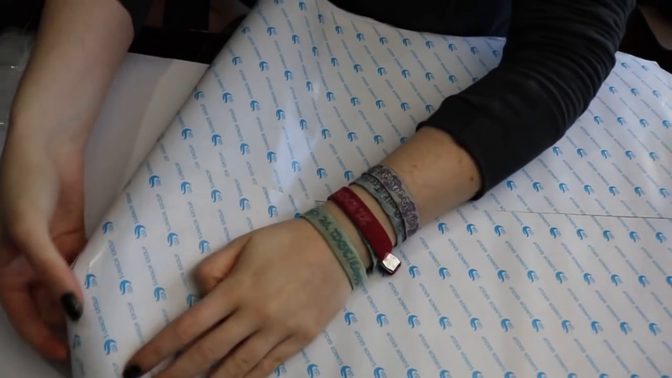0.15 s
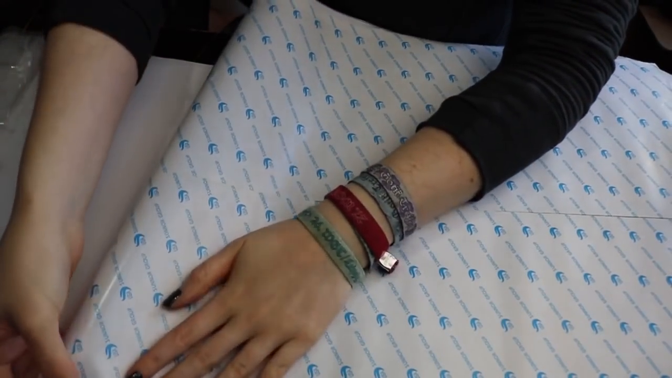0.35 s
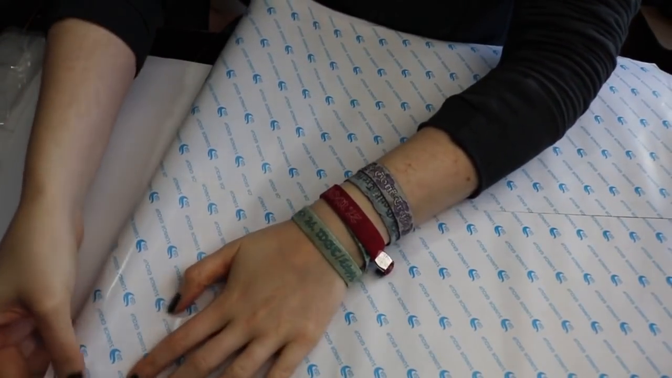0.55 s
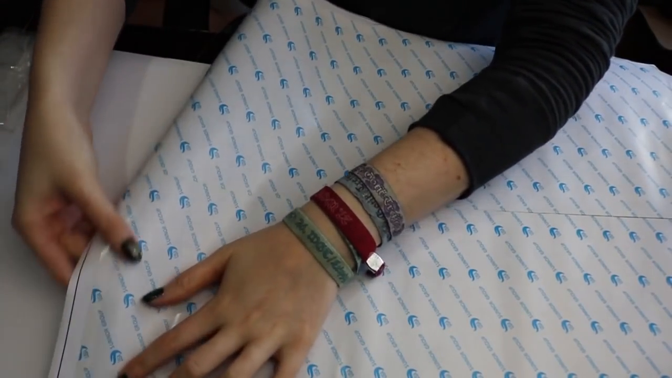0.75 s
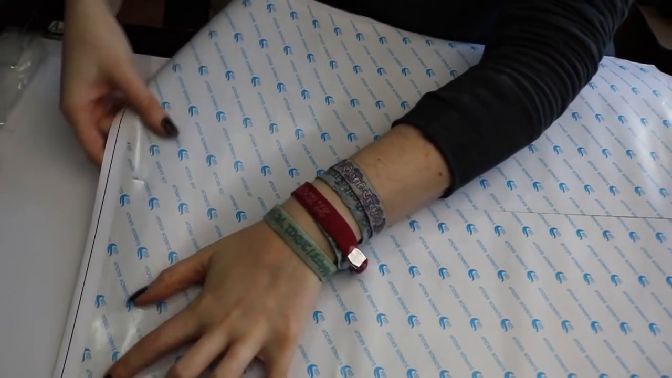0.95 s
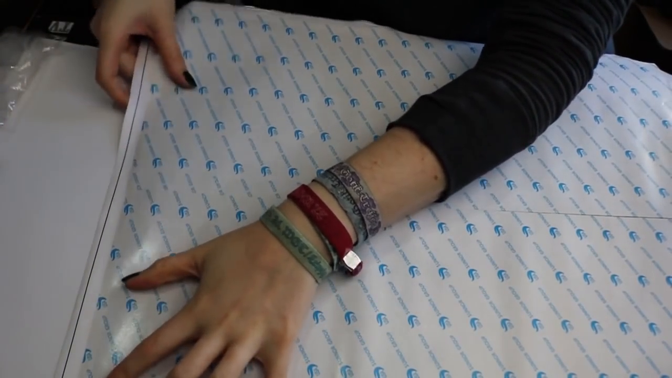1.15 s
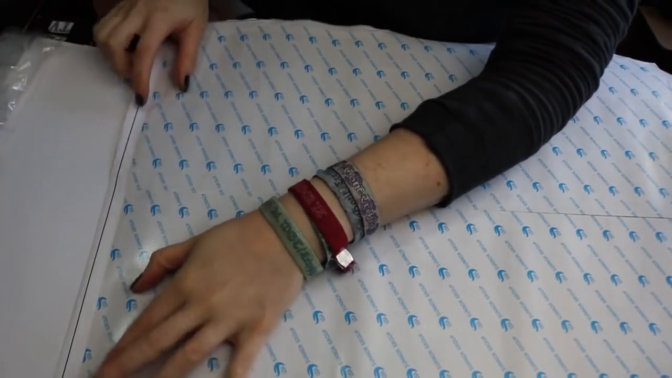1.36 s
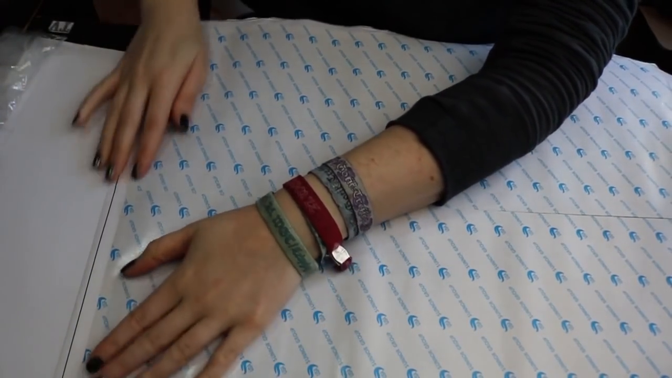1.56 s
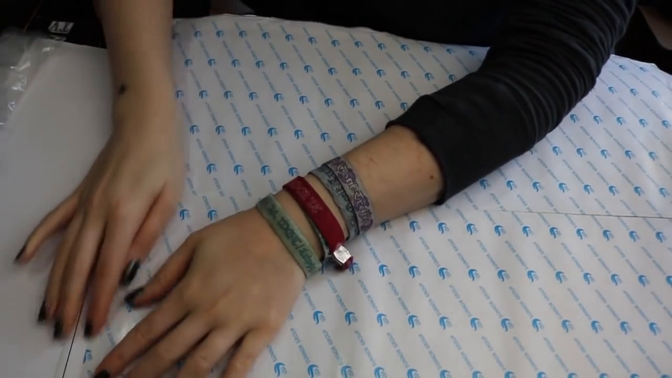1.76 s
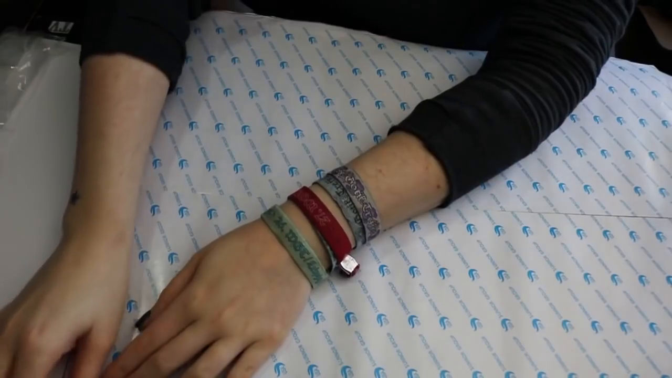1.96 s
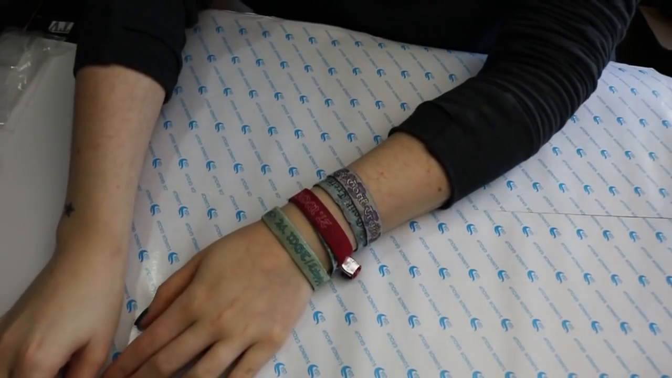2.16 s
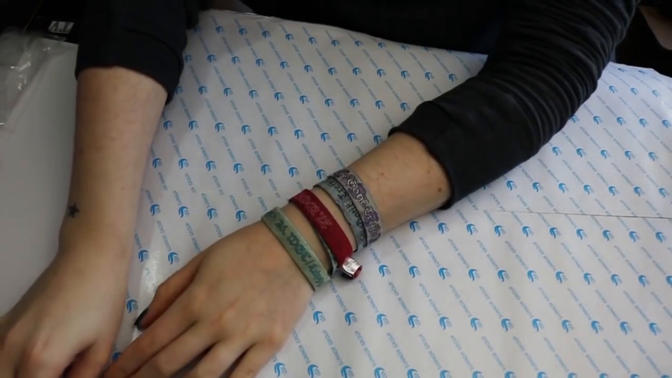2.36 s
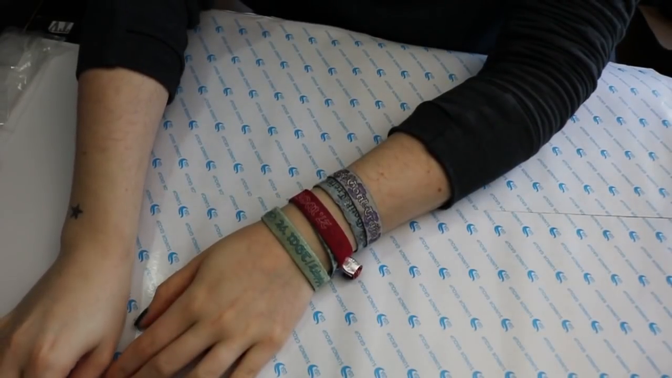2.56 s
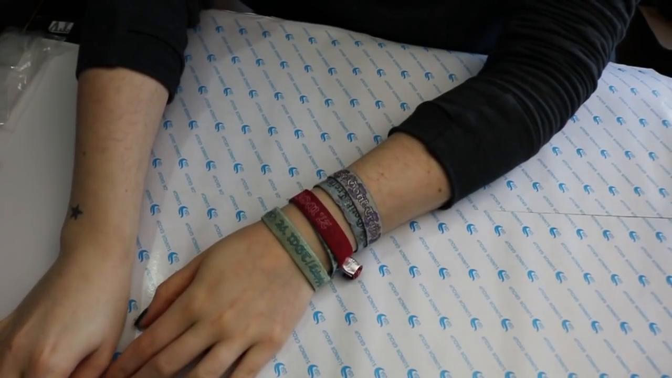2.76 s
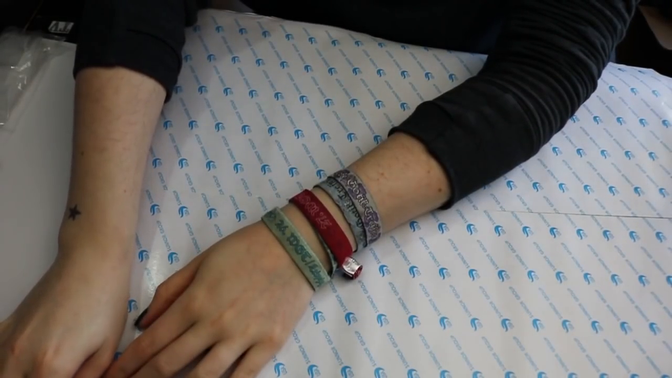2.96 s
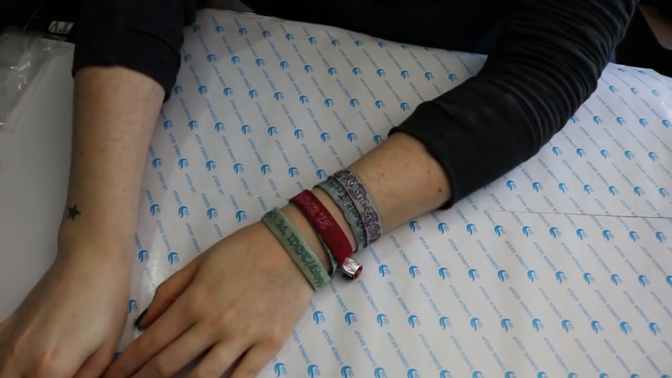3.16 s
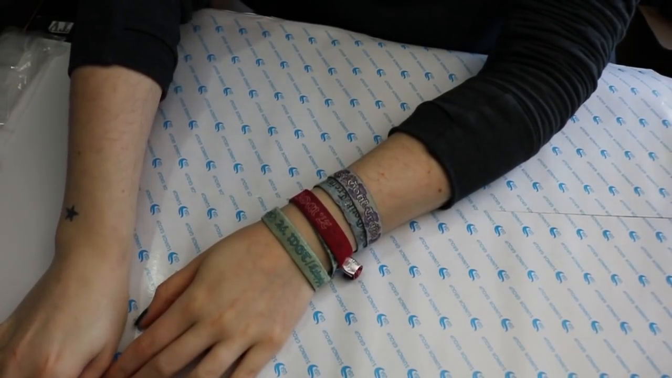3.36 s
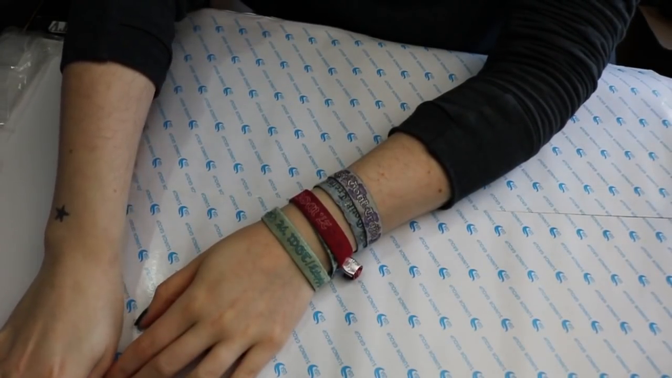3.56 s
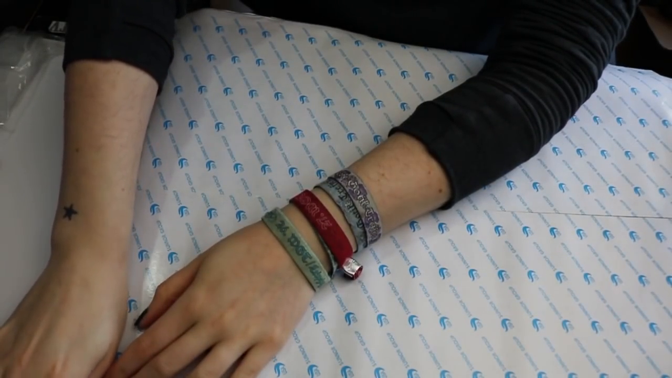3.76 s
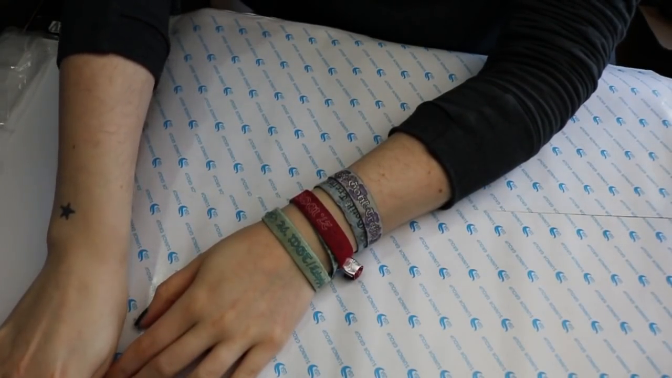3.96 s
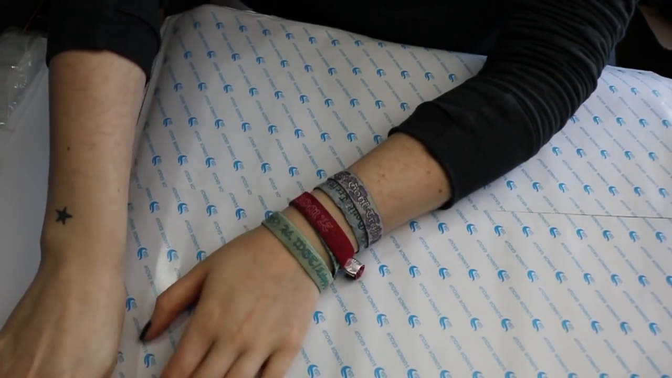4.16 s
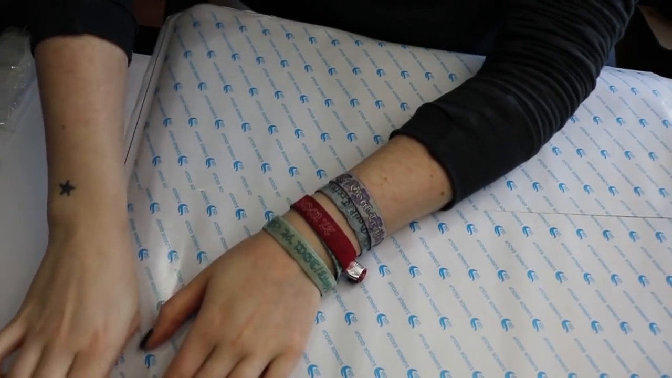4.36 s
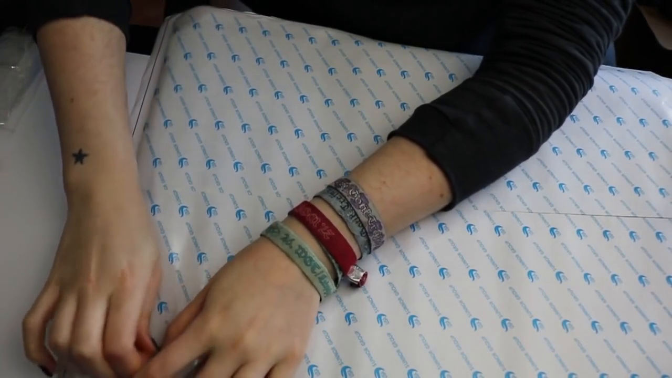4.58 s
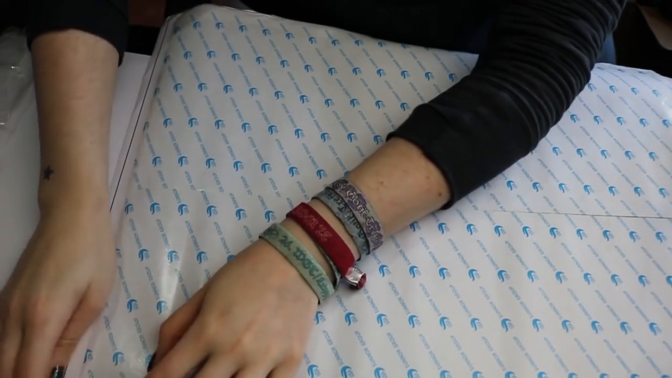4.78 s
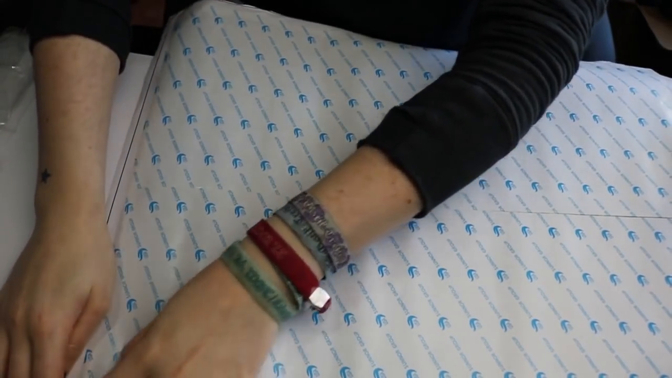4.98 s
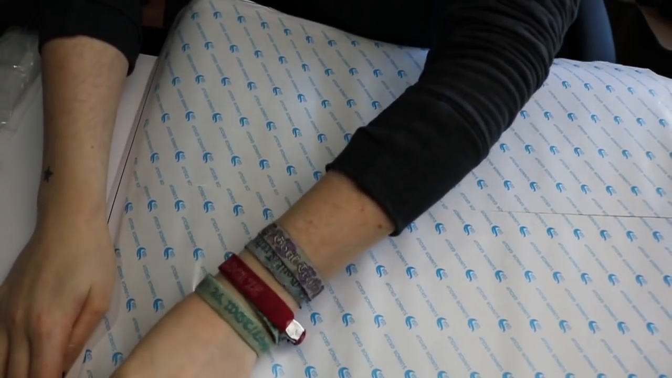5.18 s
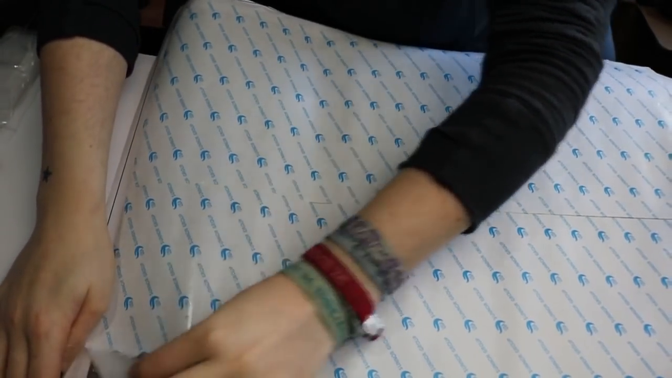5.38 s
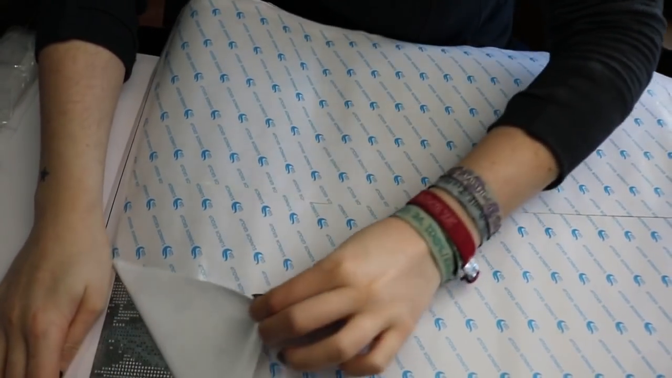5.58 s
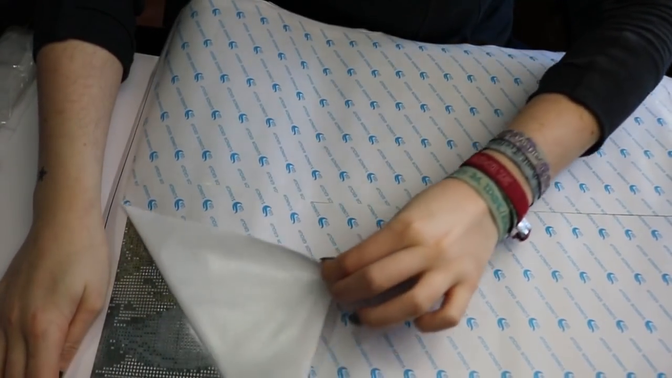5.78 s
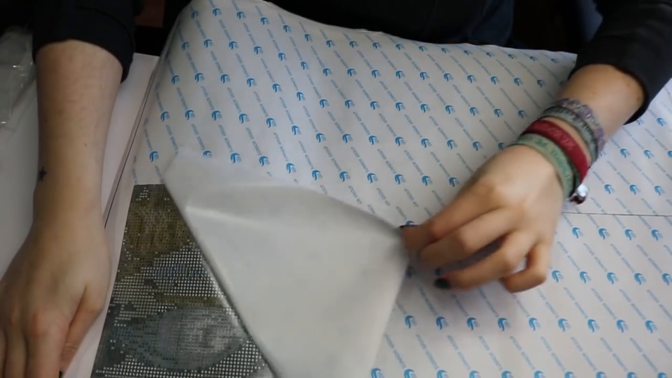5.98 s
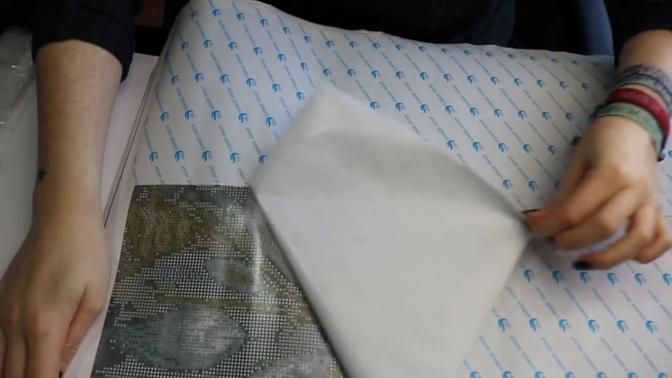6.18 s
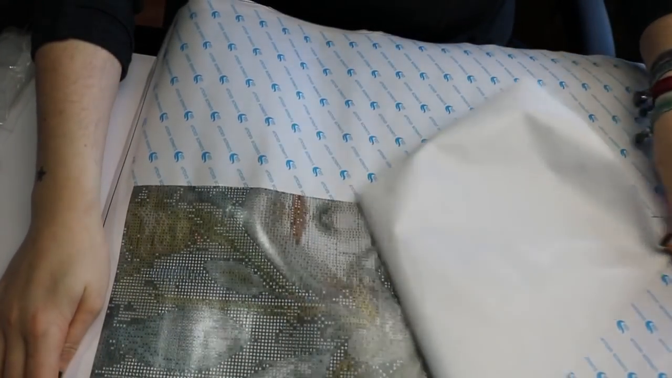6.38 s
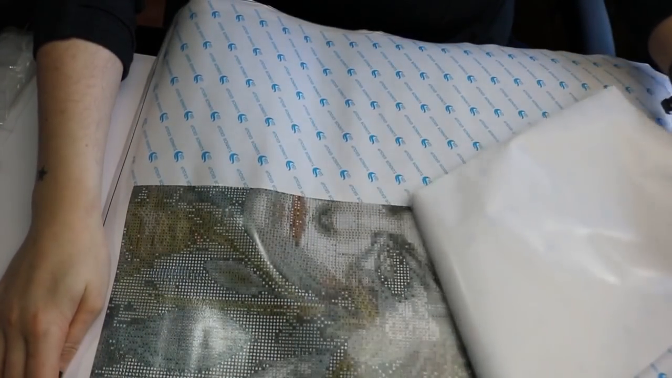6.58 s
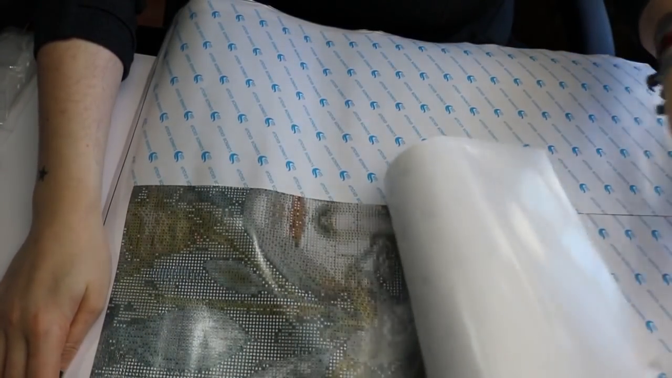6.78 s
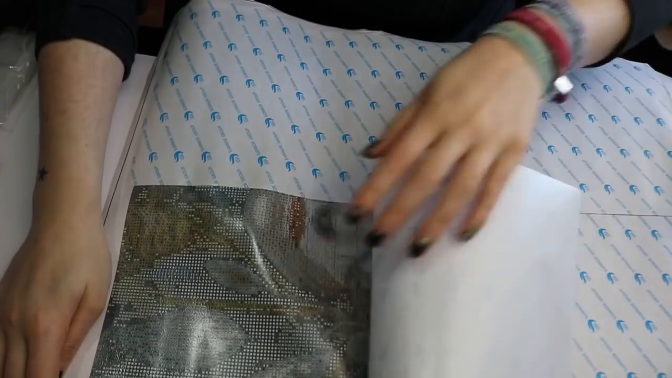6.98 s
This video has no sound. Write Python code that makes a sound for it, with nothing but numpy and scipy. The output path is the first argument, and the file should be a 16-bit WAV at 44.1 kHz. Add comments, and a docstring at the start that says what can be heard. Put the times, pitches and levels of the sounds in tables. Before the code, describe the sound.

A close, dry stereo sound in a small room with very faint rumble and hiss. At once plastic film is rubbed over a canvas, left of centre, with a low table thud and papery buckle near 0.1 s. Swishing strokes follow, strongest around 0.6-1.1 s, with a short rubbery squeak near 0.75 s. Between 1.2 and 1.5 s come little crease snaps and soft bumps, then a thin, airy smoothing rub that fades by about 2.1 s. From 2.2 to 3.9 s it is nearly quiet, with a few dull hollow knocks. A sharp, bright click cracks at about 4.5 s. Light rustles and ticks continue from 4.8 s; small scratchy tugs at 5.3-5.65 s loosen a corner. The peel starts softly, crackles, and swells to a brief rip at 6.4 s, crossing to the right. Papery flops and rustle at 6.7-6.95 s end it.

```python
"""Peeling plastic film off a canvas

Hands smooth the film on a canvas, press the canvas onto the table, pick up a corner and peel the film back.
Rubbing is shaped noise mixed with tiny slips, hollowed by a pocket of air; squeaks are short bursts of slips.
Creases snap, the canvas bumps and the sheet flops: each is a crack plus dying noise through a filter.
All is heard close by in stereo, over dull table thuds and the faint noise of a small quiet room."""
import sys
import numpy as np
from scipy import signal
from scipy.fft import rfft, irfft, next_fast_len
from scipy.io import wavfile
from scipy.ndimage import uniform_filter1d, map_coordinates

SR = 44100
rng = np.random.default_rng(int(sys.argv[2]) if len(sys.argv) > 2 else 0)


def output_pcm(signal):
    """Save a mono or channel-first signal as 16-bit PCM at the path in sys.argv[1].

    Samples are clipped to [-1, 1] before scaling.
    """
    pcm = np.clip(np.atleast_2d(signal).T, -1, 1) * 32767
    wavfile.write(sys.argv[1], SR, np.round(pcm).astype(np.int16))


N = 309846  # length in samples

# colour of the low body of the rubbing: pitch_hz, level_db
BODY_COLOUR = [(100, -29), (300, -23.5), (500, -3), (750, -4.5), (1150, -1), (1800, -10.5), (4000, -45)]
# colour of the film's rustle: pitch_hz, level_db
RUSTLE_COLOUR = [(500, -36.5), (1000, -19.5), (1500, -2.5), (2300, 0), (3500, -0.5), (5000, -10),
                 (7000, -15.5), (12000, -62)]
# colour of the high hiss: pitch_hz, level_db
HISS_COLOUR = [(2000, -22.5), (4500, 2.5), (6000, 1.5), (8000, -0.5), (10000, -2.5), (12500, -8),
               (15500, -13)]
# hollow note of the air under the sheet, higher as the pocket gets smaller: time_s, pitch_hz
POCKET_NOTE = [(0, 676), (.11, 443), (.17, 453), (.26, 660), (.31, 370), (.45, 233), (.66, 260), (.71, 450),
               (.755, 474), (.78, 757), (.84, 754), (1.2, 1056), (1.7, 1380), (1.95, 605), (4.85, 324),
               (5.55, 723), (6.25, 340), (7, 480)]
# modes of the air pocket: multiple of its note (a plain number), level_db
AIR_MODES = [(1, 5), (1.65, -27), (2.4, -13)]
# puffs of air squeezed out of the pocket: middle_s, length_s, level_db
PUFFS = [(0.153, 0.03, -34), (0.269, 0.025, -34), (0.753, 0.046, -34), (0.804, 0.028, -31)]
LAYER_DB = (-3.5, -1.5, 1.5)  # trims of body, rustle and hiss
GLIDE_CRACKLE, PEEL_CRACKLE = 0.25, 0.5  # share of crackle under a gliding palm and in parting glue (0-1)
LOOSENING = (5.45, 5.65)  # the corner comes loose between these times (s)
# top octave: base (dB), dB per dB of hiss over rustle, change once the corner is loose (dB)
SHEEN_DB, SHEEN_PER_HISS, SHEEN_GLUE_DB = 3, 0.62, -3
HOLLOW_DB = -8  # how strongly the rubbing body drives the pocket, before the air's own trim


def slide():
    """The film rubs over the canvas and swishes over a pocket of air that changes size."""
    # smooth noise while a palm glides, more crackle while creases and glue give way
    x, now = np.zeros(N), np.arange(N) / SR
    share = np.interp(now, LOOSENING, (GLIDE_CRACKLE, PEEL_CRACKLE))
    coarse = now[::64]
    layers = zip(rubbing(coarse), (BODY_COLOUR, RUSTLE_COLOUR, HISS_COLOUR), LAYER_DB)
    for level, colour, trim_db in layers:
        rub = coloured(friction(share, rate=1700, spread_db=3.5), lambda hz: along(colour, hz))
        x += np.interp(now, coarse, level) * amp(trim_db) * rub
    unsteady = x * amp(0.99 * wobble(45))
    hz, t, z = signal.stft(unsteady, SR, nperseg=512)
    hz = hz[:, None]

    # a light, hissy touch also has more sheen in the top octave
    body, rustle, hiss = rubbing(t)
    hiss_over_rustle_db = np.maximum(20 * np.log10(hiss / rustle), -4)
    sheen_db = SHEEN_DB + SHEEN_PER_HISS * hiss_over_rustle_db + np.interp(t, LOOSENING, (0, SHEEN_GLUE_DB))
    z = z * patches(z.shape, depth_db=2, rows_size=4, frames_size=9)
    z = z * amp(sheen_db * along([(8000, 0.0083), (13000, 1)], hz))

    # rubbing and puffs ring the pocket at its modes
    note_hz, = curves(POCKET_NOTE, t)
    puffing = sum(amp(db) * swell(t - s, length) for s, length, db in PUFFS)
    drive = amp(HOLLOW_DB) * body + puffing
    band = sum(amp(db + 2 * hump(hz, k * note_hz, octaves=0.08)) for k, db in AIR_MODES)
    band = band / np.sqrt(np.mean(band ** 2, axis=0))
    air = signal.stft(rng.standard_normal(N), SR, nperseg=512)[2] * band * drive * amp(-1.5)
    # the pocket radiates little below its lowest mode
    z = z * hz ** 4 / (hz ** 4 + (0.55 * note_hz) ** 4) + air

    # the sheet is wide, so part of its sound reaches left and right out of step
    spread_gain = amp(along([(300, -19), (1500, -6), (8000, -25)], hz))
    spread = spread_gain * np.abs(z) * rng.standard_normal(z.shape)
    pair = z * stereo_place(hz, hand_side(t)) + np.array([spread, -spread])
    return signal.istft(pair, SR, nperseg=512)[1][:, :N]


# strokes of the hands and tugs on the film; rise_s and fall_s are times for 20 dB; levels before LAYER_DB:
# full_strength_s, rise_s, hold_s, fall_s, rustle_db, body_over_rustle_db, hiss_over_rustle_db
STROKES = [(0.0, .02, 0.14, 0.11, -42, 1, -6), (0.247, 0.23, 0.083, 0.17, -41, 0, -3),
           (0.546, 0.18, .06, .1, -53, -3.5, -2), (0.642, 0.029, 0.33, 0.38, -38, -3, -4.5),
           (0.709, 0.04, 0.059, 0.17, -36, -0.5, -5), (1.205, 0.38, 0.11, 0.045, -44.5, -6, -2),
           (1.401, 0.075, 0.048, 0.015, -39, -7, -0.5), (1.512, 0.064, 0.048, 0.085, -56, 2, 3),
           (1.646, .12, 0.27, 0.22, -42, -12.5, -.5), (4.21, 0.14, 0.071, 0.12, -56, -10, -3),
           (4.446, 0.29, 0.11, 0.17, -52, -13, 1), (4.63, .1, 0.21, .1, -73.5, -3, 7),
           (4.839, 0.043, 0.36, 0.36, -52, -3.5, -2), (5.02, .15, 0.11, 0.2, -47, -4, -6.5),
           (5.344, 0.047, 0.017, 0.11, -45, -4, -9), (5.444, 0.096, 0.023, 0.072, -41.5, 0.5, -4),
           (5.543, 0.085, 0.0095, 0.072, -34.5, 0.5, 0.5), (5.621, 0.045, 0.019, 0.028, -40, 5.5, 5),
           (6.699, 0.049, 0.045, 0.2, -43.5, 1, -1.5), (6.874, 0.055, 0.057, .2, -54.5, -6, 3)]
# the long pull that peels the film off, levels before LAYER_DB:
# time_s, rustle_db, body_over_rustle_db, hiss_over_rustle_db
PEEL = [(5.69, -48.5, -2, 2), (6.0, -48.5, -3.5, -0.5), (6.15, -45, -2, -4.5), (6.28, -36, -0.5, -20),
        (6.35, -31.5, -6.5, -2), (6.412, -25, -4.5, -11.5), (6.45, -35.5, -10.5, -0.5),
        (6.53, -39.5, -8, -1.5), (6.661, -51.5, -8.5, -2)]
SAG_DB_PER_S = 7.5  # a stroke loses strength while it is held
FALL_CURVE = 1.4  # a stroke lets go gently, then ever faster (power of time)
PEEL_FADE_DB_PER_S = 400  # how fast the pull sets in and lets go


def rubbing(t):
    """Strength of body, rustle and hiss at the times t: strokes rise, sag and fall; the peel follows its pull."""
    power = np.full((3, len(t)), 1e-12)
    for s, rise, hold, fall, db, body_db, hiss_db in STROKES:
        u = t - s
        rise_db = 20 * np.minimum(u / rise, 0)
        sag_db = SAG_DB_PER_S * np.clip(u, 0, hold)
        fall_db = 20 * np.maximum((u - hold) / fall, 0) ** FALL_CURVE
        layer_db = np.array([[body_db], [0], [hiss_db]])
        power += amp(db + rise_db - sag_db - fall_db + layer_db) ** 2
    db, body_db, hiss_db = curves(PEEL, t)
    outside_s = np.abs(t - np.clip(t, PEEL[0][0], PEEL[-1][0]))
    db = db - PEEL_FADE_DB_PER_S * outside_s
    return np.sqrt(power + amp([db + body_db, db, db + hiss_db]) ** 2)


def friction(share, rate, spread_db):
    """Smooth rubbing noise mixed with tiny slips (rate per second) whose scattered sizes swell in clumps."""
    scatter_db = spread_db * np.minimum(rng.exponential(size=N), 3)
    sizes = amp(scatter_db + 3.33 * wobble(140))
    slips = (rng.random(N) < rate / SR) * rng.choice([-1, 1], N) * sizes
    share = np.clip(share, 0, 1)
    return np.sqrt(1 - share) * rng.standard_normal(N) + np.sqrt(share) * unit(slips)


def patches(shape, depth_db, rows_size, frames_size):
    """Random gains over frequency and time: the flexing sheet keeps changing its resonances."""
    field = rng.standard_normal(shape)
    for _ in range(2):
        field = uniform_filter1d(uniform_filter1d(field, rows_size, 0), frames_size, 1)
    return amp(depth_db * unit(field))


# the hand works on the left (+1), then carries the film over to the right; CROSS_S sets how gradually
HAND_SIDE, CROSS_AT_S, CROSS_S = 0.56, 6.22, 0.1


def hand_side(t):
    """Where the hand is at the times t: positive left, negative right."""
    return HAND_SIDE * np.tanh((CROSS_AT_S - t) / CROSS_S)


# the loudest creases snapping, level before a fixed trim: start_s, level_db, pitch_hz, ring_db
SNAPS = [(0.083, -26, 1610, -8), (0.146, -20, 1870, 10.5), (0.387, -21, 10400, 4), (1.295, -27, 1740, 15),
         (1.323, -17, 2500, 3), (1.444, -22.5, 1650, -6), (1.495, -33, 1940, 23), (4.27, -18, 6200, 19),
         (4.454, -8.5, 2450, 13), (4.509, -19, 1950, 12), (4.517, -21, 1910, 12), (4.521, -10.5, 2300, 1),
         (4.5274, -1.5, 3780, -8), (4.532, -7, 2670, -2), (4.944, -27.5, 2960, 17), (5.145, -31, 1760, 15),
         (5.152, -18, 2210, -1), (5.245, -28, 8050, 6), (5.345, -14.5, 4830, 14.5), (5.684, -26, 6030, 3),
         (6.095, -13.5, 3000, 15.5), (6.377, -16, 2200, 1), (6.404, -5.5, 2290, -6), (6.703, -20, 6030, 21)]
SNAP_T60_S, SNAP_SIDE = 0.024, 0.75  # all creases die alike (time to fall 60 dB) and lie to the left


def snaps():
    """Creases pop through: a dry crack, its pitch set by the crease size, with that pitch raised or cut."""
    out = np.zeros((2, N))
    for s, db, centre_hz, ring_db in list(SNAPS) + glue_ticks():
        tilt = [(100, -6), (900, 4.5), (5000, 18.0), (15000, -0.5)]
        crack = lambda hz: hump(hz, centre_hz, octaves=2.1) + along(tilt, hz)
        ring = lambda hz: ring_db * amp(hump(hz, centre_hz, octaves=.28))
        snap = coloured(blow(SNAP_T60_S, crack=0.68), lambda hz: crack(hz) + ring(hz))
        add(out, s, snap * amp(db - 27.5), SNAP_SIDE)
    return out


# glue lets go in small random ticks: span (s), level over the pull's rustle (dB, before the snaps' trim),
# scatter either way (dB), middle pitch (Hz), ring (dB)
TICK_SPAN, TICK_DB, TICK_SCATTER_DB, TICK_HZ, TICK_RING_DB = (5.95, 6.43), 11.5, 3, 3700, 3


def glue_ticks():
    """Rows for the tiny snaps of parting glue, stronger as the pull grows."""
    ticks = []
    for when, size, pitch in rng.random(size=(24, 3)):
        s = TICK_SPAN[0] + when * (TICK_SPAN[1] - TICK_SPAN[0])
        db = curves(PEEL, s)[0] + TICK_DB + TICK_SCATTER_DB * (2 * size - 1)
        ticks.append((s, db, TICK_HZ * 2 ** (pitch - .5), TICK_RING_DB))
    return ticks


# the loose sheet buckling and flopping over, level before a fixed trim:
# start_s, level_db, die_away_s (60 dB), brightness_db per octave around 1 kHz
FLOPS = [(0.087, -12, 0.026, 3.5), (0.257, -20.5, 0.065, 1), (0.527, -25, 0.067, 0.5),
         (4.27, -34, 0.032, 8), (4.527, -26.5, 0.045, 0.5), (6.772, -17, 0.074, 1.5),
         (6.833, -9.5, 0.024, 3.5), (6.866, -14, 0.031, 0.5), (6.873, -12, 0.056, 1),
         (6.952, -29, 0.15, -2)]
# colour of the stiff sheet: pitch_hz, level_db
SHEET_COLOUR = [(120, -45), (400, -11.5), (600, 2), (870, -3), (1150, -8), (1550, -8.5), (2200, -17),
                (3200, -16), (4200, -19.5), (5500, -29), (9000, -38), (15000, -64)]


def flops():
    """The stiff sheet buckles with a papery clap: a push and dying chatter in the sheet's colour."""
    out = np.zeros((2, N))
    for s, db, t60, bright_db in FLOPS:
        octaves_up = lambda hz: np.clip(np.log2((hz + 1) / 1000), -1, 2)
        clap = coloured(blow(t60, crack=0.24), lambda hz: along(SHEET_COLOUR, hz) + bright_db * octaves_up(hz))
        add(out, s, amp(db - 28.0) * clap, side=0.78 * hand_side(s))
    return out


# the canvas bumping on the table, levels before fixed trims: start_s, level_db, treble_db, boom_hz
BUMPS = [(0.087, -22, -10, 133), (0.528, -33.5, -25, 248), (1.26, -33, -20, 270), (1.297, -33.5, -27, 116),
         (1.326, -24.5, -46, 256), (1.384, -37, -33, 495), (1.518, -43.5, 7.5, 246),
         (2.206, -31.5, -15, 284), (2.219, -27.5, -12, 334), (2.474, -33.5, -28, 260),
         (2.733, -33.5, -4.5, 243), (2.749, -36, 2, 238), (2.767, -32.5, -5, 213), (3.008, -28.5, -11, 218),
         (3.589, -45.5, -14, 223), (3.843, -52, -21, 335), (4.529, -37, -12, 340), (4.839, -38.5, -10, 390),
         (4.942, -31, -11.5, 186), (4.97, -37.5, -15, 135)]
# colour of the canvas: pitch_hz, level_db
CANVAS_COLOUR = [(50, -37.5), (130, -8.5), (230, 3), (340, 0), (420, -7.5), (600, -5.5), (780, -6),
                 (1050, -18.5), (1650, -10), (2200, -24.5), (2850, -12), (3900, -28), (8000, -39.5),
                 (14000, -53)]
BUMP_T60_S = 0.1  # time for the thump to fall 60 dB


def bumps():
    """The canvas is pressed down and knocks hollowly on the table; its boom depends on the spot."""
    out = np.zeros((2, N))
    canvas = lambda hz: along(CANVAS_COLOUR, hz)
    for s, db, treble_db, boom_hz in BUMPS:
        boom = lambda hz: 7 * amp(hump(hz, boom_hz, octaves=0.2))
        dull = lambda hz: along([(700, 2.5), (1500, -5.0)], hz)
        bright = lambda hz: along([(400, -19), (1200, -1.5)], hz)
        thump = coloured(blow(BUMP_T60_S, crack=0.76), lambda hz: canvas(hz) + boom(hz) + dull(hz))
        tick = coloured(blow(0.047, crack=0.71), lambda hz: canvas(hz) + bright(hz))
        add(out, s, amp(db - 25.5) * (thump + amp(treble_db + 3.0) * tick), side=0.72)
    return out


# short scuffs and squeaks of film and glue: middle_s, length_s, level_db, pitch_hz, width_octaves
SCUFFS = [(.39, .018, -36, 10600, 0.49), (0.733, 0.063, -27, 1670, 0.43), (0.811, 0.059, -34, 1780, 0.19),
          (1.41, 0.036, -35, 4000, 0.55), (4.388, 0.023, -43.5, 2680, .15),
          (5.029, 0.0094, -31.5, 2930, 0.36), (5.508, 0.0046, -26, 7500, 0.28),
          (5.521, 0.0074, -23.5, 7300, 0.42), (5.637, 0.015, -37, 7250, 0.73),
          (5.849, 0.0043, -30, 3440, 0.086), (5.917, 0.02, -40, 3550, 0.14), (6.02, 0.092, -39, 3760, .35),
          (6.354, 0.011, -28, 3500, 0.18), (6.406, 0.013, -25, 2460, 0.79), (6.723, 0.024, -39, 5930, .22),
          (6.759, 0.029, -38, 7240, 0.25)]
# dull rub around each bump's boom: dB added to the bump's level, length (s), width (octaves)
PRESS_DB, PRESS_S, PRESS_OCTAVES = -24.5, 0.048, 0.47
# the film's faint fizz under each press
FIZZ_DB, FIZZ_S, FIZZ_HZ, FIZZ_OCTAVES = -65.5, 0.015, 6600, .25


def scuffs():
    """Brief swelling bursts of slips: squeaks of film and glue, and the rub and fizz that go with every press."""
    out, t = np.zeros((2, N)), np.arange(SR // 5) / SR - .1
    grit = friction(0.65, rate=2700, spread_db=6.5)
    bursts = list(SCUFFS)
    for s, db, _, boom_hz in BUMPS:
        bursts.append((s + PRESS_S / 4, PRESS_S, db + PRESS_DB, boom_hz, PRESS_OCTAVES))
        bursts.append((s + FIZZ_S / 2, FIZZ_S, FIZZ_DB, FIZZ_HZ, FIZZ_OCTAVES))
    for s, length, db, centre_hz, octaves in bursts:
        piece = grit[round(s * SR):][:len(t)]
        x = coloured(piece, lambda hz: 1.43 * hump(hz, centre_hz, octaves))
        add(out, s + t[0], x * amp(db) * swell(t, length), hand_side(s))
    return out


# a hand lands and shakes the table: start_s, level_db
THUDS = [(0.091, -27), (1.29, -53)]
# colour of the shaking table: pitch_hz, level_db
TABLE_COLOUR = [(20, -45), (32, -27), (47, 4.5), (70, -9.5), (100, -6), (145, -5.5), (220, -31), (500, -68)]
THUD_RISE_S = .008  # time to rise by 20 dB
THUD_DROP_DB, THUD_DROP_S, THUD_DECAY_DB_PER_S = 15, 0.034, 125  # a quick first drop on top of a steady decay


def thud():
    """A hand lands and the table shudders: low noise that rises fast and dies away."""
    level = np.zeros(N)
    for s, db in THUDS:
        u = np.arange(N) / SR - s
        after = np.maximum(u, 0)
        rise_db = 20 * np.minimum(u / THUD_RISE_S, 0)
        drop_db = THUD_DROP_DB * (1 - np.exp(-after / THUD_DROP_S))
        level += amp(db + rise_db - drop_db - THUD_DECAY_DB_PER_S * after)
    return level * unit(filtered(rng.standard_normal(N), lambda hz: amp(along(TABLE_COLOUR, hz))))


# how long the room rings: pitch_hz, die_away_s (60 dB)
ROOM_DECAY = [(150, 0.38), (700, 0.21), (3000, 0.18), (12000, 0.17)]


def room(x):
    """A short diffuse tail of dying noise, nearly alike in both ears in the bass."""
    hz, t, z = signal.stft(rng.standard_normal((2, SR // 3)), SR, nperseg=256)
    z[1] *= amp(along([(300, -10.0), (1200, 3.0), (3000, -6.0)], hz))[:, None]
    decay = amp(-60 * t / along(ROOM_DECAY, hz)[:, None])
    mid, side = signal.istft(z * decay, SR, nperseg=256)[1]
    tail = np.array([mid + side, mid - side])
    delayed = np.pad(x, ((0, 0), (SR // 300, 0)))
    return signal.fftconvolve(delayed, tail / np.linalg.norm(tail[0]), axes=1)[:, :N]


# colour of the room tone: pitch_hz, level_db
QUIET_COLOUR = [(15, -47.5), (25, -10), (91, -7.5), (184, -7.5), (216, -5), (276, -6.5), (333, -6.5),
                (461, -11.5), (881, -13.5), (1040, -14), (2390, -17.5), (2810, -14), (3390, -18.5),
                (7630, -20.5), (15800, -29.5)]
# how alike left and right are in the room tone: pitch_hz, likeness (0-1)
ALIKE = [(60, 0.38), (180, 0.29), (550, 0.14), (1650, 0.076), (4970, 0.01), (15000, 0.02)]
QUIET_DB = -62


def room_tone():
    """Faint room rumble and microphone hiss: steady noise, more alike left and right in the bass."""
    turn = lambda hz: np.arccos(np.clip(along(ALIKE, hz), -1, 1)) / 2
    response = lambda hz: amp(along(QUIET_COLOUR, hz)) * [np.cos(turn(hz)), np.sin(turn(hz))]
    mid, side = filtered(rng.standard_normal((2, N)), response)
    return amp(QUIET_DB) * unit(np.array([mid + side, mid - side]))


# stereo placing of a sound on the left, nearly in step in the top treble, before scaling by side:
# pitch_hz, phase_lead_rad, left_minus_right_db
PLACING = [(300, 0.36, -2.5), (860, 1.3, 0), (1400, 0.5, 9), (2330, 2.2, -0.5), (3220, 2.72, 1.5),
           (5250, 3.52, 4), (6470, 2.7, 5.5), (7100, 2.5, 7), (7960, 1.1, 7), (10700, .3, 10.5),
           (14900, 0.33, 11)]
# left and right differ a little in colour wherever the sound is: pitch_hz, left_minus_right_db
SIDE_COLOUR = [(1500, 0), (2400, -4), (3500, 0.5)]


def stereo_place(hz, side):
    """Left and right response that places a sound to one side: phase lead and level difference by pitch."""
    lead = .5j * side * along(PLACING, hz)
    tilt = (np.tanh(0.83 * side) * along(PLACING, hz, axis=2) + along(SIDE_COLOUR, hz)) / 2
    return np.array([amp(tilt) * np.exp(lead), amp(-tilt) * np.exp(-lead)])


def add(out, s, x, side):
    """Place a short sound at time s and to one side."""
    margin = 64  # samples of room for the phase lead
    padded = np.pad(x, (margin, 0))
    pair = filtered(padded, lambda hz: stereo_place(hz, np.clip(side, -1, 1)))
    start = max(round(s * SR) - margin, 0)
    out[:, start:start + pair.shape[1]] += pair[:, :N - start]


def blow(t60, crack):
    """A first sharp push followed by dying chatter."""
    t = np.arange(SR // 4) / SR
    x = rng.standard_normal(len(t)) * amp(-60 * t / max(t60, .003))
    x /= np.linalg.norm(x)
    x[0] += crack
    return x


def swell(t, length):
    """A bell-shaped rise and fall around t = 0."""
    return np.exp(-2 * (t / length) ** 2)


def hump(hz, centre, octaves):
    """A rounded peak that falls away on both sides, in dB."""
    return -20 * np.log10(1 + (np.log2((hz + 1) / centre) / octaves) ** 2 / 2)


def coloured(x, shape):
    """x through a causal filter whose gain in dB is shape(Hz), at rms 1."""
    size = 2048
    # folding the cepstrum moves all the filter's energy as early as it can be
    c = irfft(np.log(amp(shape(np.fft.rfftfreq(size, 1 / SR))) + 1e-6))
    c[1:size // 2] *= 2
    c[size // 2 + 1:] = 0
    impulse = irfft(np.exp(rfft(c)))
    return unit(signal.fftconvolve(x, impulse)[:len(x)])


def filtered(x, response):
    """x times a response of frequency."""
    n = x.shape[-1]
    m = next_fast_len(n + 8192)
    return irfft(rfft(x, m) * response(np.fft.rfftfreq(m, 1 / SR)), m)[..., :n]


def wobble(rate):
    """A smooth random curve, rate knots a second."""
    knots = rng.standard_normal(int(N * rate / SR) + 4)
    return map_coordinates(knots, [np.arange(N) * rate / SR])


def curves(rows, t=None):
    """Each column of a curve at the times t (every sample by default)."""
    s, *cols = np.transpose(rows)
    return [np.interp(np.arange(N) / SR if t is None else t, s, c) for c in cols]


def along(points, hz, axis=1):
    """A column of a table of frequencies, read on a log axis."""
    p = np.transpose(points)
    return np.interp(np.log(hz + 1), np.log(p[0]), p[axis])


def unit(x):
    """Scale to rms 1."""
    return x / np.sqrt(np.mean(x ** 2) + 1e-20)


def amp(db):
    """Decibels to gain."""
    return 10 ** (np.asarray(db) / 20)


# resonances around the canvas: pitch_hz, width_hz, level_db
RINGS = [(455.2, 4.6, 7), (762.4, 23.4, 9.5), (854, 28, 5), (1208, 130, 3.5), (1640, 60, 2.5)]


def scene():
    """Rubs and blows stir the canvas resonances; creases and scuffs sound directly; the room answers these."""
    resonance = lambda f, c, w: 1j * f * w / (c * c - f * f + 1j * f * w)
    body = lambda f: 1 + sum((amp(db) - 1) * resonance(f, c, w) for c, w, db in RINGS)
    handling = filtered(slide() + bumps() + flops(), body) + scuffs()
    cracks = snaps()
    tail = room(amp(-10) * handling + amp(-12) * cracks)
    return handling + cracks + tail + thud() + room_tone()


LOW_CUT_HZ, TOP_HZ = 36, 15950


def record(dry):
    """Round off the highest peaks, drop the lowest bass and keep nothing above the band limit."""
    rounded = dry / (1 + (dry / .8) ** 4) ** .25
    return filtered(rounded, lambda hz: (hz < TOP_HZ) * hz ** 8 / (hz ** 8 + LOW_CUT_HZ ** 8))


dry = scene()
out = record(dry)
output_pcm(out)
```